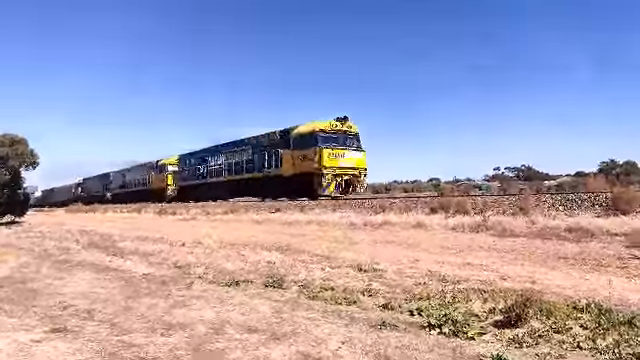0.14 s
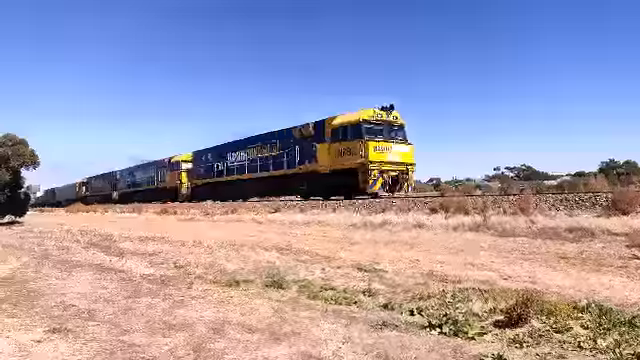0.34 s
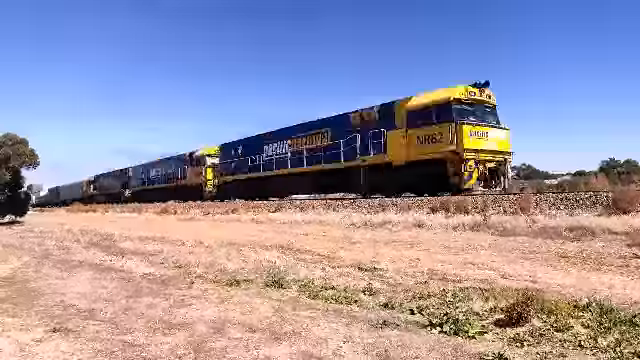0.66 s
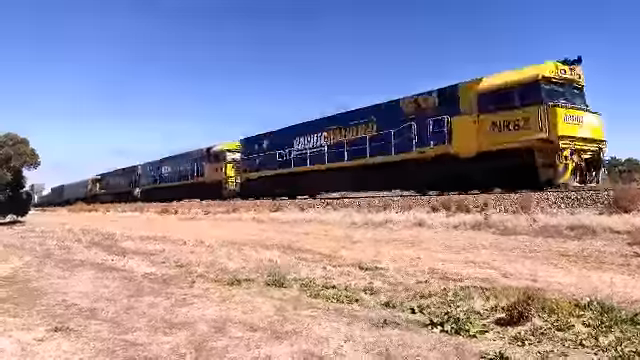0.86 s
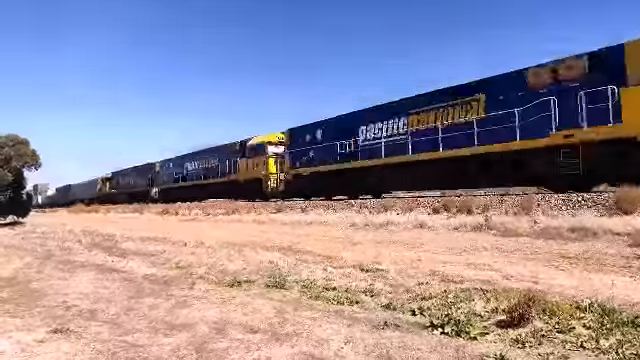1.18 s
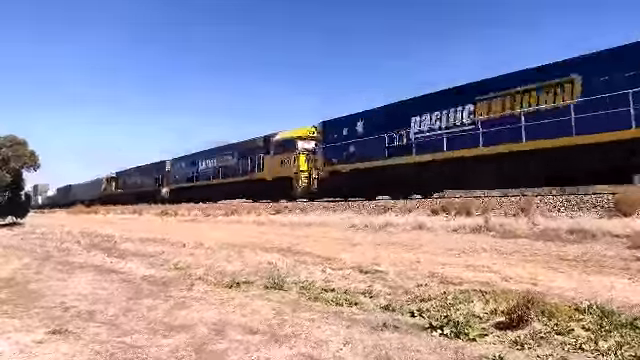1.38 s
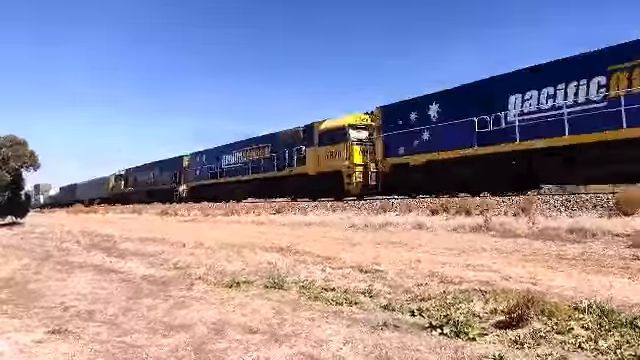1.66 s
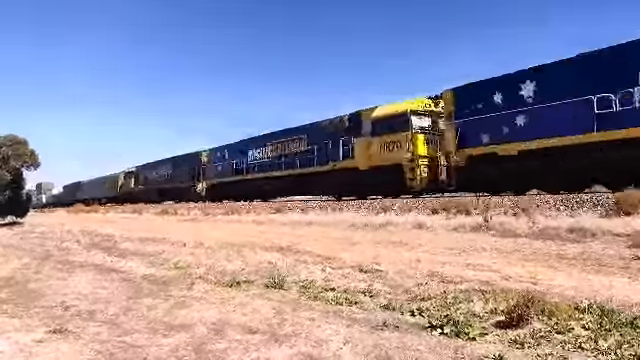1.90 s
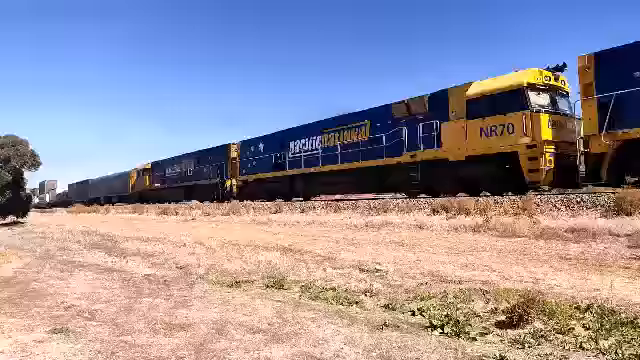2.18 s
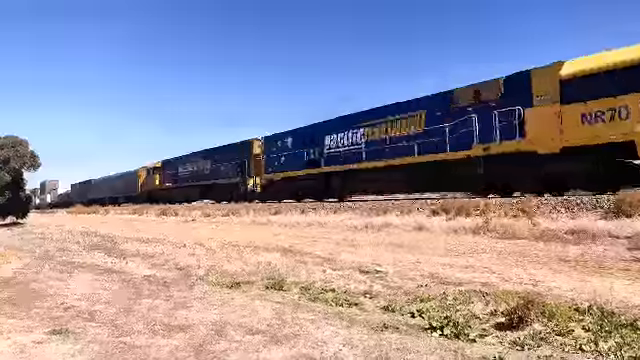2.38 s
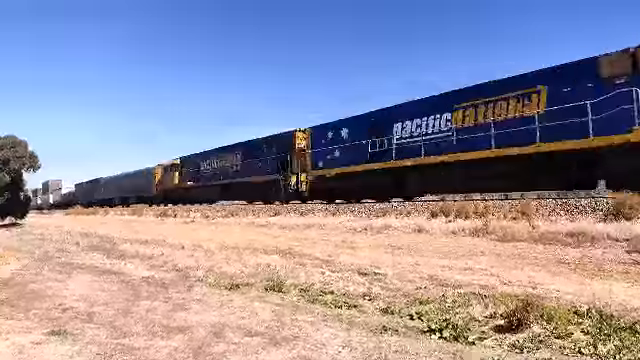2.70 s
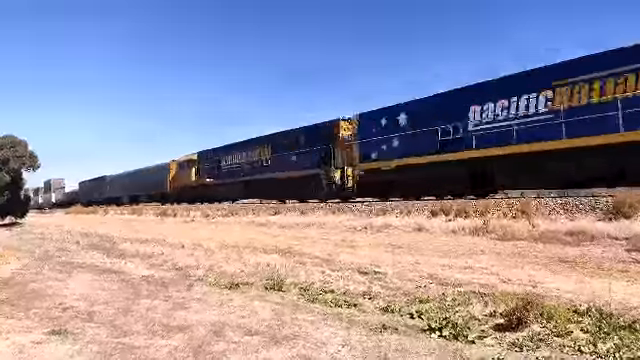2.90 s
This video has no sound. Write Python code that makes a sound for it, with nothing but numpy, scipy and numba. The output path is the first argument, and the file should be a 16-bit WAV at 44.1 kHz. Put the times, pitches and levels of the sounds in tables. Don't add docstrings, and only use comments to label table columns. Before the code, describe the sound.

A passing train of diesel locomotives roars and whines on the rails while gusts buffet the microphone.

```python
import sys
import numpy as np
from scipy import signal
from scipy.fft import irfft, next_fast_len
from scipy.io import wavfile
from scipy.ndimage import uniform_filter1d
from numba import njit

SR = 44100
rng = np.random.default_rng(int(sys.argv[2]) if len(sys.argv) > 2 else 0)


def materialize(psi):
    bounded = np.clip(np.atleast_2d(psi).T, -1, 1)
    quanta = np.round(bounded * 32767).astype(np.int16)
    wavfile.write(sys.argv[1], SR, quanta)


def invert_db(level):
    return 10 ** (np.asarray(level, dtype=float) / 20)


N = 134505
T = np.arange(next_fast_len(N + SR // 2)) / SR - .5
SPEED_M_S, TRACK_M, SOUND_M_S = 17.6, 15, 343
WOBBLE = 0.001173


def unit(x):
    return x / np.sqrt(np.mean(x ** 2))


def band(x, hz, width_hz):
    return signal.lfilter(*signal.iirpeak(hz, hz / width_hz, SR), x)


def low(x, hz):
    return signal.lfilter(*signal.butter(1, hz, fs=SR), x)


@njit
def read(x, at):
    y = np.zeros(len(at))
    for i in range(len(at)):
        k = min(max(int(at[i]), 1), len(x) - 3)
        u, a, b, c, d = at[i] - k, x[k - 1], x[k], x[k + 1], x[k + 2]
        y[i] = b + .5 * u * (c - a + u * (2 * a - 5 * b + 4 * c - d + u * (3 * (b - c) + d - a)))
    return y


def walk(rate_hz):
    return unit(read(rng.standard_normal(200), 2 + (T - T[0]) * rate_hz))


# f/Hz, level/dB per Hz
ROLL = [(30, -18), (60, -13), (130, -3.5), (400, -5.5), (800, -7.5), (3200, -15.5), (7500, -20.5),
        (13000, -31)]
# f/Hz, width/Hz, level over the roar/dB
WHEELS = [(455, 25, 3.5), (642, 24, -2), (955.4, 120, 9.5), (1510, 220, 5.5), (1920, 325, 5),
          (2370, 256, 7.5), (2834, 133, 7.5), (5093, 59, 6)]
FLICKER_DB, DIFFUSE_HZ = 1, 2130


def roar():
    f = np.fft.rfftfreq(len(T), 1 / SR) + 1
    roll_hz, roll_db = np.array(ROLL).T
    gain = invert_db(np.interp(np.log(f), np.log(roll_hz), roll_db))
    gain *= 1 + sum((invert_db(db) - 1) / (1 + (2 * (f - hz) / width) ** 4) for hz, width, db in WHEELS)
    one, other = rng.standard_normal((2, len(f))) + 1j * rng.standard_normal((2, len(f)))
    alike = 1 / (1 + (f / DIFFUSE_HZ) ** 2)
    spectrum = gain * np.array([one, alike * one + np.sqrt(1 - alike ** 2) * other])
    total = 0
    for lo, hi in ((0, 700), (700, 4000), (4000, SR)):
        part = irfft(spectrum * ((f >= lo) & (f < hi)), len(T))
        total = total + part * invert_db(FLICKER_DB * walk(10))
    return unit(total)


PATCHY_DB, PATCH_HZ = 5, 7.835


def tone(hz, db, patchy=1):
    level = invert_db(db + patchy * PATCHY_DB * walk(PATCH_HZ))
    return level * np.sin(2 * np.pi * (np.cumsum(hz) / SR + rng.random()))


# f/Hz, place along the train
GEARS = [(465, 1), (461, 3), (478, 4)]
GEAR_DB = [-36, -40, -39]
MESH_DB = [0, 1.5, -1, -4.5, -8, -4, -21]
AHEAD_S = .4


def gears():
    for (hz, place), db in zip(GEARS, GEAR_DB):
        mesh = hz * (1 + WOBBLE * walk(6))
        ahead = 1 / (1 + np.exp((T - PLACES[place] + .1) / AHEAD_S * 4))
        yield place, ahead * sum(tone((k + 1) * mesh, db + d) for k, d in enumerate(MESH_DB))


# f/Hz, place along the train
BLOWERS = [(2525, 4), (5050, 4), (1562, 2), (1562, 5), (2075, 1), (600, 2)]
BLOWER_DB = [-49, -62, -39.5, -50, -41, -39.5]


def blowers():
    for (hz, place), db in zip(BLOWERS, BLOWER_DB):
        yield place, tone(hz * (1 + WOBBLE * walk(3.4)), db)


# t/s and f/Hz as heard at the phone, place along the train
FLARING = [(2.9, 2312, 5), (2.66, 487, 4), (.56, 970, 1), (2.2, 957, 3), (2.46, 981, 3), (2.11, 1430, 3),
           (1.26, 3340, 1), (2.92, 2515, 5), (2.9, 925, 3), (1.08, 976, 3), (1.85, 498, 4), (1.3, 5295, 4),
           (1.15, 1627, 3), (2.92, 2892, 5), (1.32, 952, 1), (1.78, 994, 5), (2.55, 5105, 3),
           (2.45, 2800, 3), (2.03, 994, 4), (2.26, 997, 4), (2.72, 996, 5), (2.8, 970, 4), (2.4, 945, 3),
           (.3, 976, 2), (.88, 965, 1), (.7, 1007, 3), (1.47, 973, 3), (1.97, 5225, 3), (2.32, 5160, 3),
           (2.2, 2850, 3), (2.25, 2585, 3), (1.62, 1607, 2), (1.65, 2635, 4), (1.95, 2990, 5),
           (2.5, 1885, 4), (.95, 2410, 2), (2.85, 2565, 5), (2.75, 5090, 4)]
# half length/s, level as heard/dB
FLARES = [(0.21, -28.5), (.15, -23), (0.089, -23.5), (0.18, -23.5), (0.065, -22), (0.21, -30.5),
          (0.088, -45), (0.26, -31), (0.21, -30), (0.18, -25.5), (0.17, -33), (0.27, -44), (0.21, -33),
          (0.16, -36.5), (0.11, -24), (0.15, -26), (0.065, -40), (0.21, -32.5), (0.081, -26), (0.019, -26),
          (0.22, -27), (0.11, -25.5), (0.14, -25), (0.14, -32.5), (0.085, -26.5), (0.21, -31), (0.14, -31),
          (.08, -41), (.09, -41), (0.053, -28), (0.11, -29.5), (0.045, -28.5), (.17, -37), (0.29, -39),
          (0.15, -33), (0.24, -40), (0.16, -35), (0.083, -43.5)]


def flares():
    for (at, hz, place), (half, db) in zip(FLARING, FLARES):
        along = SPEED_M_S * (at - PLACES[place])
        r = np.hypot(along, TRACK_M)
        sent = at - (r - TRACK_M) / SOUND_M_S
        sent_hz = hz / (1 - SPEED_M_S * along / r / SOUND_M_S)
        swell = r / TRACK_M * np.exp(-((T - sent) / half) ** 4)
        yield place, swell * tone(sent_hz * (1 + 1.5 * WOBBLE * walk(14)), db, .5)


# firing f/Hz, place along the train
EXHAUSTS = [(59, 2), (60, 5)]
EXHAUST_DB = [-38.5, -38]
# f/Hz, width/Hz, level/dB
PIPE = [(62, 36, 11), (117.4, 62, 11.5), (235, 16, 3)]
SCATTER_DB = 1.5


def exhausts():
    for (hz, place), level_db in zip(EXHAUSTS, EXHAUST_DB):
        count = int(hz * 4)
        jitter, strength = rng.standard_normal((count, 2)).T
        pulses = np.zeros(len(T) + SR)
        firing = np.abs(SR / hz * (np.arange(count) + .04 * jitter)).astype(int)
        pulses[firing] = invert_db(SCATTER_DB * strength)
        throb = sum(invert_db(db) * band(pulses[:len(T)], f, width) for f, width, db in PIPE)
        yield place, invert_db(level_db) * unit(throb)


AIR_DB_PER_M, AIR_HZ = 0.14, 2420
BASS_LAG_HZ = 480
FACING_RAD, PORTS_S = -1.045, 0.000481


def passing(x, passes_s):
    along = SPEED_M_S * (T - passes_s)
    r = np.hypot(along, TRACK_M)
    dull = low(x, AIR_HZ)
    x = (dull + (x - dull) * invert_db(-AIR_DB_PER_M * (r - TRACK_M))) * TRACK_M / r
    heard = slice(SR // 2, SR // 2 + N)
    late = (T - T[0] - (r - TRACK_M) / SOUND_M_S)[heard] * SR
    lag = PORTS_S / 2 * SR * np.sin(np.arctan2(along, TRACK_M) - FACING_RAD)[heard]
    bass = signal.filtfilt(*signal.butter(3, BASS_LAG_HZ, fs=SR), x)
    ports = []
    for k, side in enumerate((-1, 1)):
        ports.append(read(bass[k], late) + read(x[k] - bass[k], late + side * lag))
    return np.array(ports)


# t/s, half length/s, level/dB, left over right/dB
GUSTS = [(0.06, 0.0042, -28, 17), (0.098, 0.017, -39, 14), (0.24, 0.022, -44, 18), (0.277, 0.0035, -24, 18),
         (0.447, 0.027, -49, 18), (0.512, 0.016, -37, 4), (0.54, 0.1, -43, 10), (0.632, 0.0064, -22.5, 4),
         (0.703, 0.03, -34, -3), (0.772, 0.018, -28, -1), (0.936, 0.056, -35, 11), (1.024, 0.028, -33, -11),
         (1.082, 0.019, -15.5, 3), (1.112, 0.022, -19, 5), (1.161, 0.011, -19.5, -13),
         (1.187, 0.0045, -34, -3), (0.386, 0.059, -39.5, 14), (1.215, 0.057, -29, -6),
         (1.332, 0.029, -28.5, 9), (1.436, 0.041, -29.5, 4), (1.469, 0.0062, -20.5, 11),
         (1.513, 0.0068, -23, 12), (2.88, 0.16, -35, -12)]
WIND_HZ, WIND_WIDTH_HZ, WIND_CUT_HZ, BREEZE_DB = 223, 400, 93, -34


def wind():
    t = np.arange(N) / SR
    env = invert_db(BREEZE_DB + 2.6 * np.array([walk(7.65)[:N], walk(12)[:N]]))
    for at, half, db, pan_db in GUSTS:
        sides = invert_db(db + np.array([[pan_db], [-pan_db]]) / 2)
        env = env + sides * np.exp(-((t - at) / half) ** 2)
    air = band(rng.standard_normal((2, N)), WIND_HZ, WIND_WIDTH_HZ)
    gusts = env * unit(low(low(air, 430), 660))
    return signal.lfilter(*signal.butter(2, WIND_CUT_HZ, "high", fs=SR), gusts)


PLACES = [
    1.3,
    1.8,
    2.3,
    2.95,
    3.1,
    3.9,
    5.0,
]
BOGIES = [-29.5, -26.5, -25, -25, -30.5, -22.5, -24]
# t/s, level/dB
LOAD = [(0, -4), (.3, -2.5), (.6, -2.5), (.9, -1.5), (1.2, -1), (1.5, 0), (1.8, 0.5), (2.1, 1), (2.4, 1.5),
        (2.699, 0.5), (3.05, 2)]


def scene():
    train = [invert_db(db) * roar() for db in BOGIES]
    for source in (gears, blowers, flares, exhausts):
        for place, sound in source():
            train[place] = train[place] + sound
    load = invert_db(np.interp(np.arange(N) / SR, *np.array(LOAD).T))
    return load * sum(passing(x, s) for s, x in zip(PLACES, train)) + wind()


# f/Hz, spreads below the mean
HOLES = [(2000, 3), (2700, 1.5), (3200, 1.9), (5800, 1.5), (7000, 1.8), (8300, 1.3), (10000, 1.2),
         (11200, .4), (12200, -.4), (13200, -1.3), (13800, -2.4), (15500, -2.8)]
BLOTCH_DB, HOLE_DB, BLOTCH_HZ = 2.5, -50, 2500
RIGHT_TOP, QUIET_TOP = 1.12, .09
SPARSE, TOGETHER = .9, .4


def blotches(x):
    f, t, z = signal.stft(x, SR, nperseg=2048, noverlap=1792)

    def patches(b):
        return b.repeat(9, axis=1).repeat(13, axis=2)[:, :len(f), :len(t)]

    own, common = rng.standard_normal((2, 120, 45)), rng.standard_normal((2, 1, 45))
    swell, chance = patches(own), patches(unit(own + TOGETHER * common))
    treble = np.clip(f / BLOTCH_HZ - .5, 0, 1)[:, None]
    quiet = 1 + QUIET_TOP * np.clip(1 - t / 1.5, -.3, 1)
    lift = np.array([1, RIGHT_TOP])[:, None, None] * quiet
    place_hz = np.where(f[:, None] > 9000, f[:, None] * lift, f[:, None])
    hole = chance < -np.interp(place_hz, *np.array(HOLES).T)
    db = BLOTCH_DB * swell * treble + HOLE_DB * hole
    size = uniform_filter1d(np.abs(z), 7, axis=2)
    around = uniform_filter1d(size, 24, axis=1) + 1e-12
    kept = (size / around) ** (SPARSE * treble)
    return signal.istft(z * kept * invert_db(db), SR, nperseg=2048, noverlap=1792)[1][:, :N]


def roll_off(x):
    return signal.sosfilt(signal.butter(12, 15200, fs=SR, output="sos"), x)


LEFT_TREBLE_DB, TREBLE_HZ, TOP_HZ = 7, 5500, 9400
LEFT_BUMP_HZ, LEFT_BUMP_WIDTH_HZ, LEFT_BUMP = 685, 180, 0.26


def record(dry):
    tilt = invert_db(np.array([[LEFT_TREBLE_DB], [-LEFT_TREBLE_DB]]) / 2)
    dry = dry + LEFT_BUMP * np.array([[1], [-1]]) * band(dry, LEFT_BUMP_HZ, LEFT_BUMP_WIDTH_HZ)
    dull = low(dry, TREBLE_HZ)
    x = signal.lfilter(*signal.butter(2, [50, TOP_HZ], "band", fs=SR), dull + tilt * (dry - dull))
    mix = blotches(x)
    return roll_off(mix)


dry = scene()
out = record(dry)
materialize(out)
```